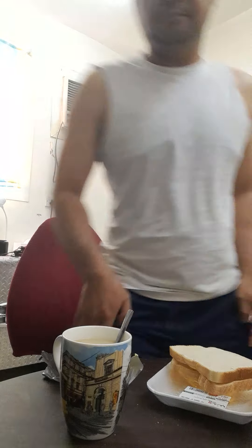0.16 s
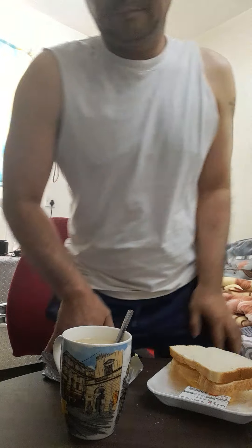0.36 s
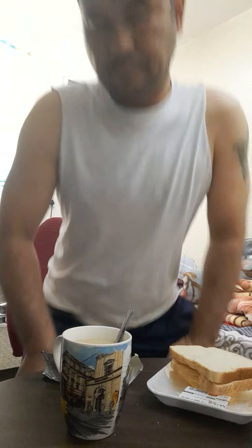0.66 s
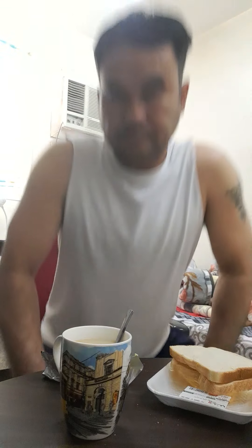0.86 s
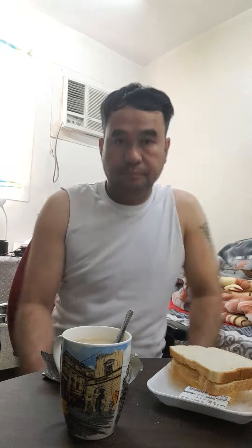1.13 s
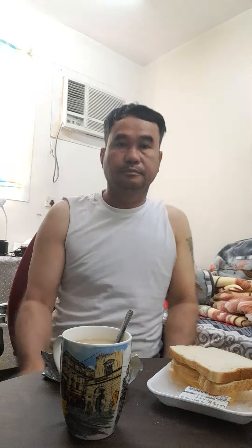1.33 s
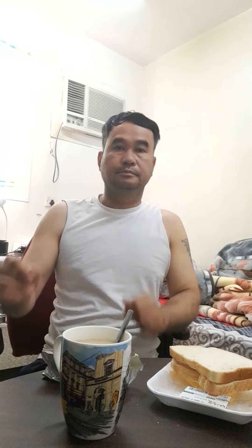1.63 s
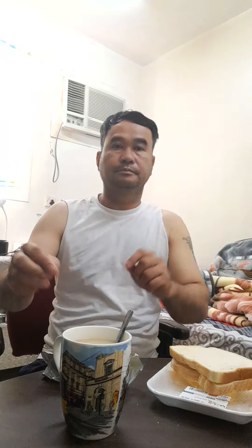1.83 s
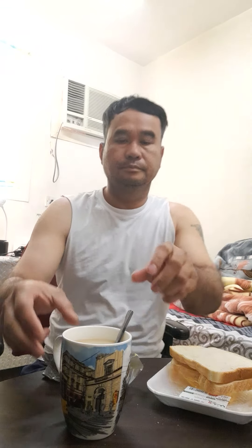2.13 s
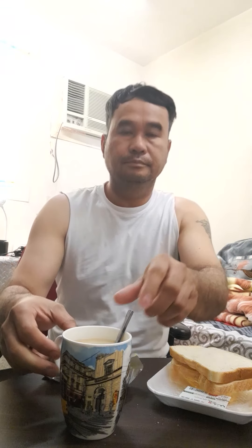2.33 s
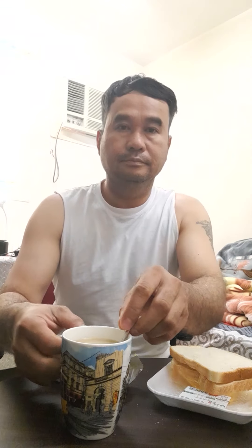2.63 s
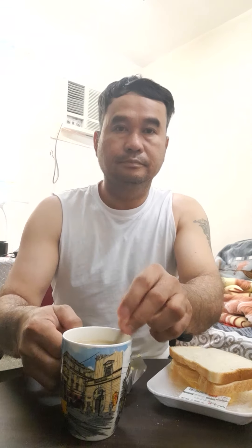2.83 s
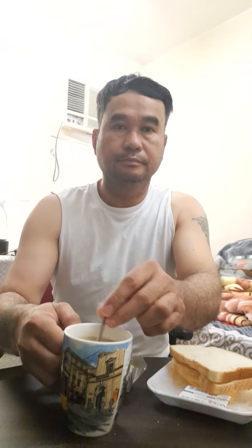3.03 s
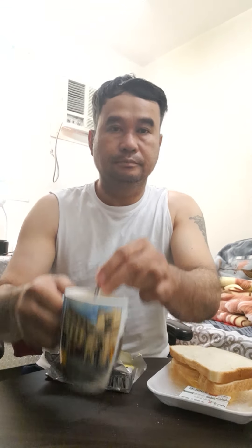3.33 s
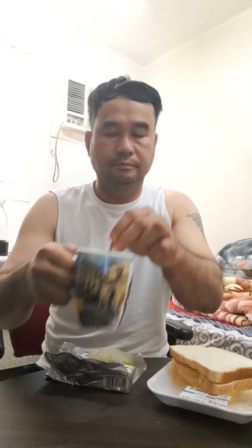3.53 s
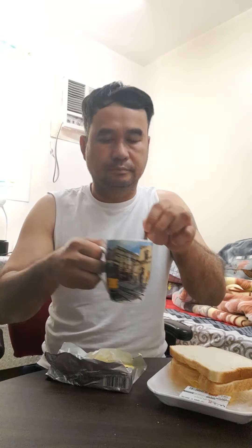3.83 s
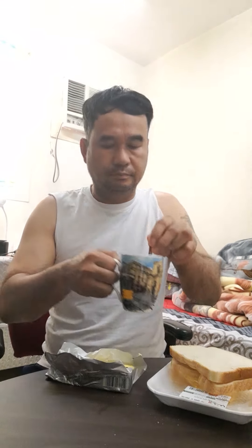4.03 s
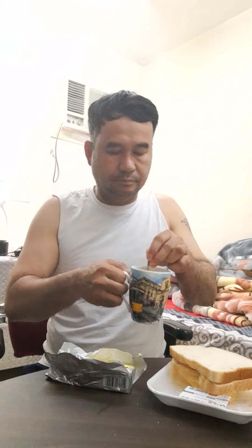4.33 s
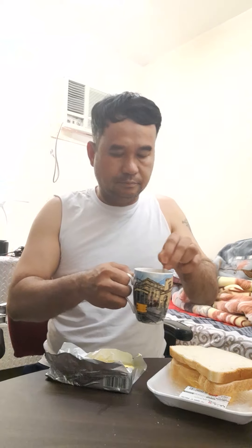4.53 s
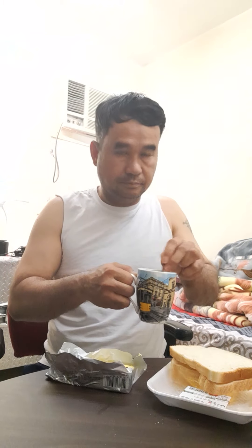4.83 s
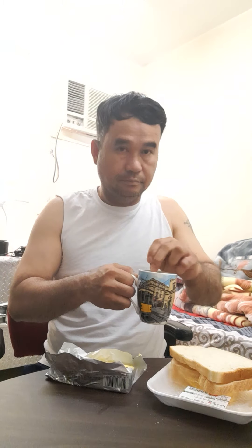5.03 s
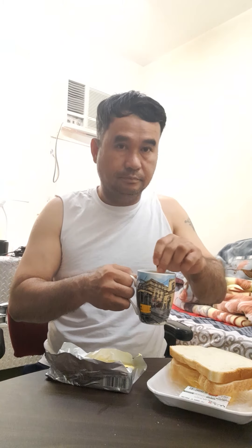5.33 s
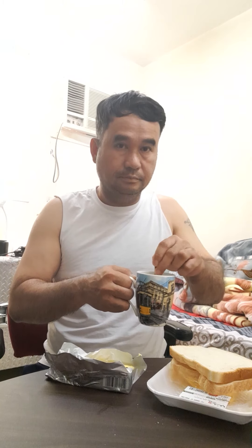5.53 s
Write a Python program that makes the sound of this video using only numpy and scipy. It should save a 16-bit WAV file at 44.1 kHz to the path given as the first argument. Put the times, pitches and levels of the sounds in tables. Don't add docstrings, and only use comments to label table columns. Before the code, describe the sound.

Close stereo pickup in a bedroom: deep motor hum swells and dips throughout. First cloth rustles and body shuffles, then one loud woody chair knock with smaller rattles and creaks. After a calmer moment, a mug's foot bumps and skids across the table while its spoon clinks brightly. Held in the hand, the mug gives isolated ticks, then duller, more frequent stirring taps and faint scraping.

```python
import sys
import numpy as np
from scipy import signal
from scipy.fft import rfft, irfft, next_fast_len
from scipy.io import wavfile

SR = 44100
rng = np.random.default_rng(int(sys.argv[2]) if len(sys.argv) > 2 else 0)


def persist_wave(psi):
    counts = np.round(np.clip(psi, -1, 1) * 32767).astype(np.int16)
    wavfile.write(sys.argv[1], SR, np.atleast_2d(counts).T)


def elevation(decibels):
    levels = np.asarray(decibels, float)
    return 10 ** (levels / 20)


N = 249606
T = np.arange(N) / SR


def rms_one(x):
    return x / np.sqrt(np.mean(x ** 2) + 1e-30)


def in_time(rows, silent=None):
    s, *columns = np.transpose(rows)
    return [np.interp(T, s, c, silent, silent) for c in columns]


def at_hz(points, hz):
    curve_hz, value = np.array(points)[:, 0], np.array(points)[:, 1]
    return np.interp(np.log(hz + 1), np.log(curve_hz), value)


def drift(rate_hz):
    steps_per_s = 60
    steps = rng.standard_normal(int(N / SR * steps_per_s) + 2)
    memory = np.exp(-2 * np.pi * np.clip(rate_hz, .1, 25) / steps_per_s)
    wander = rms_one(signal.lfilter([1], [1, -memory], steps))
    return np.interp(T * steps_per_s, np.arange(len(steps)), wander)


# freq_hz, likeness_0_to_1
PORT_LIKENESS = [(40, 0.8), (150, 0.57), (300, 0.7), (600, 0.22), (1200, 0), (16000, 0.)]


def hiss(spectrum, grain_db=0.):
    size = next_fast_len(N)
    hz = np.fft.rfftfreq(size, 1 / SR)
    grain = elevation(grain_db * np.minimum(rng.exponential(1, size), 5))
    white = rng.standard_normal((2, size)) * grain
    inside = (hz > spectrum[0][0]) * (hz < spectrum[-1][0])
    mid, side = rfft(white) * elevation(at_hz(spectrum, hz)) * inside
    alike = np.clip(at_hz(PORT_LIKENESS, hz), 0, 1)
    both = np.sqrt(1 + alike) * mid + np.sqrt(1 - alike) * side * [[1], [-1]]
    pair = irfft(both, size)[:, :N]
    return pair / np.std(pair.mean(axis=0))


def dying(db, t60, rise_s):
    t = np.arange(int(min(t60, .4) * SR)) / SR
    return t, elevation(db - 60 * t / t60) * (1 - np.exp(-t / rise_s))


def struck(hz, db, t60, rise_s=.0002):
    t, shape = dying(db, t60, rise_s)
    return shape * np.sin(2 * np.pi * hz * t)


def puff(db, t60, low_hz, high_hz, rise_s=.0002):
    band = signal.butter(3, [low_hz, high_hz], "band", fs=SR, output="sos")
    t, shape = dying(db, t60, rise_s)
    noise = signal.sosfilt(band, rng.standard_normal(len(t) + 900))[400:]
    return shape * rms_one(noise)[:len(t)]


def rung(hz, t60, clicks):
    r, w = elevation(-60 / (t60 * SR)), 2 * np.pi * hz / SR
    return rms_one(signal.lfilter([1, 0, -1], [1, -2 * r * np.cos(w), r * r], clicks))


def strokes(rows, colour_share=0.):
    power = 1e-12
    for s, db, swell_s, fade_s, *colour_db in rows:
        away = np.where(T < s, (s - T) / max(swell_s, .003), (T - s) / max(fade_s, .003))
        power = power + elevation(db + colour_share * sum(colour_db) - 20 * away) ** 2
    return 10 * np.log10(power)


def add(out, s, sound):
    at = int(s * SR)
    out[at:at + len(sound)] += sound[:N - at]


def placed(x, pan_db, lag):
    left = np.interp(np.arange(N) - lag, np.arange(N), x)
    return np.array([left * elevation(pan_db / 2), x * elevation(-pan_db / 2)])


# freq_hz, t60_s
ROOM_DECAY = [(250, 0.62), (1000, 0.43), (4000, 0.25), (12000, 0.19)]


def bedroom(x):
    t = np.arange(int(.4 * SR)) / SR
    tail, white = 0, rng.standard_normal((2, len(t)))
    for low in 125 * 2. ** np.arange(7):
        band = signal.butter(2, [low, 2 * low], "band", fs=SR, output="sos")
        tail = tail + signal.sosfilt(band, white) * elevation(-60 * t / at_hz(ROOM_DECAY, 1.4 * low))
    tail = tail * np.clip(t / 0.0044 - .5, 0, 1)
    tail = tail / np.sqrt(np.sum(tail ** 2) / 2)
    return signal.fftconvolve(x[None], tail, axes=1)[:, :N]


# slow_hz, fast_hz
COMPRESSOR_HZ = (57.965, 58.825)
# order, slow_db, fast_db, left_minus_right_db, slow_turn_rad, fast_turn_rad (turned by the room)
HUM_ORDERS = [(1, -51.3, -48.4, -3.5, 2.05, 2.27), (2, -47.4, -50.3, 0, .32, .05),
              (3, -63, -59.8, -1.2, .85, .8), (5, -75, -74, -6, .4, .4)]
# pitch_hz, level_db
FAN_TONES = [(79, -78), (154, -71)]
# freq_hz, level_db_per_hz
RUMBLE_COLOUR = [(28, -58), (42, 1), (52, -14.5), (64, 13), (74, 4.5), (100, 2), (150, 0), (200, -10.5),
                 (260, -84)]
# freq_hz, level_db_per_hz
AIR_COLOUR = [(120, -29), (200, -7.5), (257, -6.5), (300, -4), (336, -7.5), (464, -10), (885, -23),
              (961, -26.5), (2400, -34), (3120, -45), (5280, -120)]
OPPOSED_AT_S = .6
RUMBLE_DB, AIR_DB = -56.5, -65.5
LULL_DB, LULL_WIDTH = -2.5, 0.63


def air_conditioners():
    hum = 0
    slow, fast = 2 * np.pi * np.outer(COMPRESSOR_HZ, T - OPPOSED_AT_S)
    for order, slow_db, fast_db, pan_db, slow_turn, fast_turn in HUM_ORDERS:
        slow_line = elevation(slow_db) * np.sin(round(order) * slow + slow_turn)
        fast_line = elevation(fast_db) * np.sin(round(order) * fast + fast_turn)
        hum = hum + placed((slow_line - fast_line) * elevation(0.88 * drift(11)), pan_db, 0)
    for hz, db in FAN_TONES:
        tone = elevation(db + 2.5 * drift(2)) * np.sin(2 * np.pi * hz * T + .4 * drift(1.5))
        hum = hum + placed(tone, -1.5, 0)
    throb = np.hypot(np.sin((fast - slow) / 2), np.sin(fast - slow))
    lull_db = LULL_DB * np.exp(-(throb / LULL_WIDTH) ** 2)
    air = elevation(AIR_DB + lull_db + 0.33 * drift(14)) * hiss(AIR_COLOUR) * elevation([[-.6], [.6]])
    rumble = elevation(RUMBLE_DB + 1.9 * lull_db) * hiss(RUMBLE_COLOUR) * elevation([[-1.5], [1.5]])
    return hum + air + rumble


# peak_s, level_db, swell_s, fade_s (swell and fade span 20 dB)
WEIGHT_SHIFTS = [(0.001, -57.5, .05, 0.049), (.11, -66, 0.39, 0.76), (.4, -65.5, 0.46, 0.13),
                 (.51, -53, 0.13, 0.11), (1.01, -52.5, 0.12, 0.19), (1.25, -44.5, 0.076, 0.095),
                 (1.205, -40.5, 0.026, 0.035), (1.42, -51, 0.12, 0.085), (1.68, -68.5, 0.41, 0.51),
                 (1.93, -72, .04, 0.37), (2.27, -69.5, 0.016, 2.9), (2.42, -80, 0.6, 0.15),
                 (5.362, -86, 0.016, .03), (5.44, -67, 0.039, 2.2), (5.659, -62, 0.0099, .05)]
# peak_s, level_db, swell_s, fade_s, fine_fibres_rel_db
RUSTLES = [(0.001, -67.5, .05, 0.055, -5), (.11, -65, 0.25, .45, -5.5), (.285, -55, 0.065, 0.13, -2.5),
           (.37, -64, .2, 0.28, -4), (.51, -49, 0.048, 0.092, -5), (.77, -68, 0.95, 0.48, 1),
           (1.06, -66.5, 0.61, 0.27, 4.5), (1.11, -57, 0.0094, 0.18, -17), (1.25, -49, 0.013, 0.11, -10),
           (1.42, -76.5, 0.11, 0.5, 2.5), (1.65, -69.5, 0.13, 0.51, -1), (1.85, -74.5, 0.4, 0.26, 3.5),
           (1.93, -63, 0.038, 0.1, 1.5), (2.26, -78.5, 0.081, 0.42, -1)]
# peak_s, level_db, swell_s, fade_s
SLEEVE_SLIDES = [
    (1.5, -73.5, 0.32, 0.49),
    (1.64, -71, 0.17, 0.16),
]
# freq_hz, level_db_per_hz
SHUFFLE_COLOUR = [(120, -43), (200, -3), (320, 2.5), (358, 0), (392, -2.5), (1020, -10.5), (2200, -18.5),
                  (2860, -64), (4840, -120)]
# freq_hz, level_db_per_hz
CLOTH_COLOUR = [(760, -10), (1300, -14.5), (1550, -7), (1870, -6.5), (1980, -3), (2470, -7), (4360, -3.5),
                (4750, -7), (7460, -8), (8600, -35), (11200, -64), (18900, -120)]
# freq_hz, level_db_per_hz
FIBRE_COLOUR = [(4710, -8.5), (8000, -10), (9040, -11.5), (12600, -5.5), (15100, -11.5), (16000, -19)]
# freq_hz, level_db_per_hz
SLEEVE_COLOUR = [(5800, -30), (6500, 0), (7600, -2), (8200, -27), (10500, -20), (11500, 1), (13000, -4),
                 (14500, -27)]


def clothes():
    shuffle = elevation(strokes(WEIGHT_SHIFTS)) * hiss(SHUFFLE_COLOUR, grain_db=3)
    cloth = elevation(strokes(RUSTLES) + .8 * drift(14)) * hiss(CLOTH_COLOUR, grain_db=2)
    fibres = elevation(strokes(RUSTLES, 1)) * hiss(FIBRE_COLOUR, grain_db=2.5)
    sleeve = elevation(strokes(SLEEVE_SLIDES)) * hiss(SLEEVE_COLOUR)
    return (shuffle + cloth + fibres + sleeve) * elevation([[-.7], [.7]])


# peak_s, peak_db, place (0 seat, 1 back, 2 frame), joint_rel_db
CHAIR_KNOCKS = [(.966, -51, 1.5, 0), (0.982, -46.5, 0.5, -10), (1.0, -59, 2, -14), (1.107, -27, 3, -9.5),
                (1.116, -39, 1.3, -16), (1.207, -42.5, 0, 0), (1.218, -48, 0.5, -12),
                (1.232, -35.5, 1.96, -17), (1.247, -45, 1.5, -20), (1.271, -48.5, 3.5, -10),
                (1.384, -46.5, 1.2, 0), (1.416, -52.5, 0.9, -14), (1.441, -63, 6, -5),
                (1.512, -54, 1.7, -19)]
# pitch_hz, level_db, t60_s, part (0 seat, 1 back, 2 frame, 3 joints)
CHAIR_MODES = [(290, -2, .08, 0), (345, -2, .08, 0), (455, -3, .08, 0), (522, -1, .15, 1),
               (560, 3.5, .18, 1), (640, -6, .06, 1), (900, -9, .06, 2), (1055, -6, .13, 2),
               (1103, 0, .19, 2), (1138, -6, .16, 2), (1240, -9, .06, 2), (1450, -11, .04, 2),
               (2000, -4, .05, 3), (2250, -3, .05, 3), (2420, -7, .045, 3), (2690, -10, .04, 3),
               (1700, -8, .04, 3)]
NEXT_PART_DB = -4


def chair_knocks():
    out = np.zeros(N)
    chances = rng.normal(0, 1, (len(CHAIR_KNOCKS), len(CHAIR_MODES)))
    for (peak_s, db, place, joint_db), luck in zip(CHAIR_KNOCKS, chances):
        parts = [*(NEXT_PART_DB * (np.arange(3) - place) ** 2), joint_db]
        s = peak_s - .003
        loose = .003 * np.clip(-32 - db, 0, 14)
        for (hz, mode_db, t60, part), chance in zip(CHAIR_MODES, luck):
            level_db = db + parts[round(part)] + mode_db - 0.5
            pitch_hz = hz * (1 + loose * chance * (.3 if part == 3 else 1))
            add(out, s, struck(pitch_hz, level_db, t60 / (1 + 45 * loose), rise_s=.0018))
        add(out, s, puff(db + parts[2] - 5, 0.073, 440, 1560, rise_s=0.00077))
        add(out, s, puff(db + parts[3] - 7.5, 0.055, 1400, 3440, rise_s=0.00045))
        add(out, s, puff(db + parts[2] - 8, .03, 350, 3400))
    return placed(out, -2.5, -9) + elevation(-3.5) * bedroom(out)


# start_s, peak_db, pitch_hz, t60_s
CREAKS = [(.953, -58, 2010, 0.12), (.962, -55.5, 2130, 0.097), (.975, -56, 1800, .08),
          (.963, -50, 450, 0.16), (1.003, -49, 1100, 0.039), (1.104, -42, 4200, 0.045),
          (1.105, -42, 2220, 0.079), (1.107, -43, 2700, 0.061), (1.228, -42, 850, 0.072),
          (1.245, -47, 3340, 0.071), (1.19, -51, 2320, 0.076), (1.199, -42, 2200, .06),
          (1.229, -45, 1250, .06), (1.381, -53, 2280, 0.13), (1.43, -63, 2220, 0.15),
          (1.51, -54.5, 514, 0.11)]


def chair_creaks():
    creaks = np.zeros(N)
    for s, db, hz, t60 in CREAKS:
        add(creaks, s, puff(db, t60, hz * 0.87, hz * 1.103, rise_s=0.002))
    return placed(creaks, -1.7, -2.5) + elevation(-4.5) * bedroom(creaks)


# start_s, peak_db
THUDS = [
    (2.666, -54),
    (2.703, -55),
    (2.8762, -27.5),
    (3.018, -39),
    (3.041, -42.5),
    (3.064, -44.5),
]
# pitch_hz, level_db, t60_s
TABLE_MODES = [(166.5, 0.5, 0.15), (213.4, -3, 0.24), (273, 10, 0.05), (319, 16, 0.031), (459, -4, 0.11),
               (550, -8, 0.089), (710, -5, 0.042), (990, -24, 0.022), (1430, -4.5, 0.019)]
# start_s, peak_db, pitch_hz, t60_s
CATCHES = [(2.567, -52, 704, 0.07), (2.669, -49, 454, .04), (2.69, -54.5, 1420, .04),
           (2.704, -47.5, 1000, 0.023), (2.745, -45.5, 1056, 0.028), (2.746, -51, 754, 0.028),
           (3.022, -57, 1437, 0.11), (3.028, -38, 385, 0.037), (3.04, -61, 1050, .05),
           (3.058, -55, 970, .05), (3.066, -53.5, 783, 0.054), (3.077, -54, 1374, 0.046),
           (3.082, -60, 690, 0.035)]
# peak_s, level_db, swell_s, fade_s
SLIDES = [(2.566, -55, 0.039, 0.41), (2.724, -48.5, 0.081, 0.2), (2.81, -51.5, 0.2, 0.028),
          (2.874, -59, 0.0099, 0.052), (3.03, -58, 0.058, 0.18), (3.055, -47, 0.06, 0.051),
          (3.086, -51.5, 0.12, 0.015), (3.1, -62.5, .02, 0.38)]
# pitch_hz, level_db, t60_s
SKID_MODES = [(285, -0.5, 0.1), (346, 3, 0.042), (450, -7.5, 0.095), (690, -9.5, 0.04), (1000, -14, 0.049),
              (1380, -13.5, 0.046), (1950, -5.5, 0.05)]
# peak_s, level_db, swell_s, fade_s
FINGER_RUBS = [
    (2.355, -70.5, .03, 0.077),
    (2.395, -78, .1, 0.025),
]
# freq_hz, level_db_per_hz
DRAG_COLOUR = [(110, -35), (180, 8), (322, -12), (502, -12), (594, -0.5), (649, -12), (1030, -12.5),
               (1290, -17), (1410, -18), (1580, -14.5), (1900, -9.5), (2470, -15), (4180, -120)]
# freq_hz, level_db_per_hz
GRIT_COLOUR = [(1900, -34), (2600, -1), (4200, -3), (7000, -9), (11000, -15.5), (15500, -5)]
SLIPS_PER_S, SKID_DB, GRIT_DB = 860, -12.5, -18.5


def table():
    bumps = np.zeros(N)
    for s, db in THUDS:
        for hz, mode_db, t60 in TABLE_MODES:
            add(bumps, s, -struck(hz, db + mode_db - 11, t60, rise_s=0.0029))
    for s, db, hz, t60 in CATCHES:
        add(bumps, s, struck(hz, db, t60, rise_s=0.00059))
    drag_db = strokes(SLIDES)
    slips = rng.standard_normal(N) * (rng.random(N) < SLIPS_PER_S / SR)
    skid = sum(elevation(db) * rung(hz, t60, slips) for hz, db, t60 in SKID_MODES)
    bumps += elevation(drag_db + SKID_DB) * skid
    bumps += elevation(strokes(FINGER_RUBS)) * rung(1500, 0.011, rng.standard_normal(N))
    drag = elevation(drag_db - 8.5 + 3.2 * drift(22)) * hiss(DRAG_COLOUR, grain_db=1)
    grit = elevation(drag_db + GRIT_DB) * hiss(GRIT_COLOUR, grain_db=-7)
    return placed(bumps, -10, 7.5) + elevation(-9.5) * bedroom(bumps) + (drag + grit) * elevation([[-2.5], [2.5]])


# start_s, peak_db, wall_rel_db (depth), crack_rel_db (edge-on), rim_rel_db (bounce)
LOOSE_TICKS = [(2.5187, -77.5, 11, 5, 3), (2.5663, -49, -11, -12, 8.5), (2.582, -51.5, 0, -14, 2.5),
               (2.593, -72, -1, -11, 6), (2.604, -68, -6, -11, 6), (2.614, -66.5, 11, -6, -6),
               (2.6357, -66, 10, -6, 4), (2.66, -67.5, 12, -6, 11), (2.7039, -85, 12, 42, -8),
               (2.7213, -56, 0, 12.5, 13), (2.7452, -42.5, 0.5, 8.5, 0.5), (2.847, -76, -4, 20, -10),
               (2.9745, -54, 7, 5, -1), (3.0417, -63, -3, 11, -10), (3.163, -79.5, 18.5, 5, 4),
               (3.175, -71, -3, 6, -5), (3.1911, -77.5, 26, 7, 0), (3.222, -69, 16, -12, -10),
               (3.264, -45.5, 4.5, -10, -12), (3.284, -66, 16, -6, -1), (3.3627, -57.5, 10.5, 1.5, -9.5),
               (3.693, -60, -14, -17, -17), (3.732, -54, 0, -24, -1), (3.775, -79, 26, 0, 0),
               (3.993, -77.5, 3, 20, -8), (4.0157, -63.5, -30, 2, -21), (4.2634, -52, -4.5, 2, -5.5),
               (4.4377, -70, -14, -20, -4), (4.5136, -48.5, -5, -18, -6), (4.561, -73, 14.5, -10, 2),
               (4.6, -81, 9, -10, 4)]
# start_s, peak_db, wall_rel_db, crack_rel_db, rim_rel_db
STIR_TICKS = [(4.7341, -72.5, -15, -16, 1), (4.798, -80, -6, 11, 0), (4.8184, -66, 6.5, 9, -5),
              (4.851, -71, 2, 6, 2), (4.8864, -54, -3.5, 2.5, -1), (4.9481, -76, 13, 9, 0),
              (5.022, -66.5, 2.5, 4, 5), (5.0479, -68, 5, 7, -4), (5.0887, -50, -8, -6.5, -5),
              (5.1122, -71.5, 4, 15.5, -5), (5.2356, -81, -2, 14, -5), (5.263, -65, -3, -10, 3),
              (5.2705, -49.5, -6, -3, -5), (5.4036, -59.5, -4.5, -2, -2), (5.427, -48, -5, -8, 3.5),
              (5.5538, -47.5, -4, 2, -3), (5.5961, -45, 0.5, 11, -2), (5.6544, -65, 6, 1.5, 0)]
# pitch_hz, level_db, t60_s, part (0 wall, 1 rim, 2 spoon, 3 handle)
MUG_MODES = [(2170, -16, .08, 0), (2410, -22, .05, 0), (5020, -14, .02, 1), (5570, 3, .07, 1),
             (5630, -7, .06, 1), (5740, -10, .06, 1), (5900, -9, .04, 1), (6260, -15, .025, 1),
             (6560, -11, .025, 1), (7000, -12, .02, 2), (7420, -1, .028, 2), (7750, -8, .025, 2),
             (8215, -4, .028, 2), (9400, -11, .025, 2), (3960, -8, .02, 3)]
LOOSE_PITCH = .008
DROWNED_DB = 12
HELD_RIM_DB = -10.5
KNOCK_HZ, KNOCK_DB, KNOCK_T60_S = 1885, 11.5, 0.012


def spoon_ticks(held, sag):
    out, ticks = np.zeros(N), [*LOOSE_TICKS, *STIR_TICKS]
    chances = rng.normal(0, 1, (len(ticks), len(MUG_MODES)))
    for (s, db, depth_db, edge_db, bounce_db), luck in zip(ticks, chances):
        hold, rim_sag = held[int(s * SR)], sag[int(s * SR)]
        spoon_db = -DROWNED_DB * 1.6 * hold ** 4
        parts = [depth_db, bounce_db, spoon_db, edge_db]
        for (hz, mode_db, t60, part), chance in zip(MUG_MODES, luck):
            grip_db = (HELD_RIM_DB if mode_db > 0 else -3) * hold
            level_db = db + parts[round(part)] + mode_db + grip_db + 1.5 * chance
            pitch = rim_sag if part == 1 else 1 + LOOSE_PITCH * hold * chance
            add(out, s, struck(hz * pitch, level_db, t60 / (1 + 2.4 * hold)))
        knock_hz = KNOCK_HZ * (1 + 0.042 * luck[0])
        add(out, s, hold ** 2 * struck(knock_hz, db + depth_db + KNOCK_DB, KNOCK_T60_S))
        add(out, s, hold ** 2 * puff(db + depth_db - 2, 0.094, 1865, 2370))
        add(out, s, hold * puff(db + 5, 0.0098, 4370, 6400))
        add(out, s, hold * puff(db + bounce_db + 1.1 * spoon_db - 1.5, 0.061, 5280, 5340))
        add(out, s, hold * puff(db + 2.2 * spoon_db + 0.5, 0.053, 6740, 7820))
        add(out, s, puff(db + edge_db - 1, 0.011, 3370, 5350))
        add(out, s, puff(db - 4 - 3.7 * hold, 0.011, 3000, 11500))
        add(out, s, puff(db - 26, 0.014, 13000, 22000))
    return out


# start_s, peak_db, low_hz, high_hz,
# t60_s
BRUSHES = [(3.042, -57.5, 3800, 7400, 0.085), (3.265, -61, 4200, 9000, 0.12), (4.262, -67, 1220, 1950, .06),
           (4.2632, -50, 6270, 8600, 0.024), (4.4378, -66.5, 5240, 15000, 0.069),
           (4.5136, -62.5, 5300, 6100, 0.064), (4.8174, -71.5, 3300, 4660, 0.17),
           (4.8864, -67.5, 6500, 11000, .1), (5.262, -65, 5800, 8100, .12), (5.427, -64, 6000, 8750, .15),
           (5.554, -59, 5800, 8900, .08), (5.5958, -58, 3500, 8600, 0.13), (2.567, -54, 8500, 16000, .025),
           (2.581, -58, 8400, 16000, .03), (2.7455, -53, 8600, 16000, 0.028),
           (5.427, -57, 8000, 14000, .01), (5.0891, -54, 4870, 6600, 0.011), (5.403, -62, 4000, 6050, .012)]


def spoon_brushes():
    out = np.zeros(N)
    for s, db, low_hz, high_hz, t60 in BRUSHES:
        add(out, s, puff(db, t60, low_hz, min(high_hz, 20000), rise_s=.0003))
    return out


# peak_s, rim_db, swell_s, fade_s, wall_rel_db (depth)
RUBS = [(2.45, -87, 0.12, .2, 0), (2.65, -83, 0.1, 0.18, 6), (2.8, -67.5, 0.13, 0.072, 15.5),
        (3.21, -89.5, 0.025, 0.085, 37), (3.44, -91, 0.074, 0.048, 21), (3.82, -71, 0.12, 0.037, 9),
        (4.3, -101.5, 0.11, 0.15, 28.5), (4.95, -73.5, 0.48, 0.28, -14), (5.33, -71, 0.23, 0.39, -13.5),
        (5.44, -60.5, 0.026, 0.2, -14), (5.6, -85, 0.081, 0.073, 13)]
WALL_HZ, WALL_T60_S = 2083, .3


def wall_bell(held):
    energy = (elevation(strokes(RUBS, 1) - 1) * (1 - .6 * held)) ** 2
    for s, db, depth_db, _, _ in [*LOOSE_TICKS, *STIR_TICKS]:
        hold = held[int(s * SR)]
        t, ring = dying(db + depth_db - 2 - 6 * hold, WALL_T60_S / (1 + 1.2 * hold), .001)
        settled = 1 + (t / 0.047) ** 3.5
        add(energy, s, (ring / settled) ** 2)
    tone = np.sin(2 * np.pi * WALL_HZ * T + .5 * drift(12))
    return np.sqrt(energy) * elevation(1.2 * drift(25) - 1) * tone


# time_s, level_db
RIM_GRAB = [
    (2.49, -99),
    (2.518, -63.5),
    (2.562, -59),
    (2.57, -47),
    (2.696, -70),
    (2.7, -80),
]
# freq_hz, level_db_per_hz
RASP_COLOUR = [(3500, -12), (4600, -5), (5200, 1), (5600, 10.5), (6100, -4), (6800, -35), (7500, -20),
               (9500, -19)]
HANDLE_DB, HANDLE_PER_DEPTH = 14.5, -0.51


def spoon_rubbing(held, sag):
    wall_db, rim_db = strokes(RUBS, 1), strokes(RUBS)
    handle_db = HANDLE_DB + strokes(RUBS, HANDLE_PER_DEPTH)
    grains = rng.standard_normal(N) * (rng.random(N) < 2500 / SR)
    band = signal.butter(4, [1900, 2500], "band", fs=SR, output="sos")
    out = held * elevation(wall_db + 6.5) * rms_one(signal.sosfilt(band, grains))
    part_db = [0, rim_db - 11, rim_db - 14, handle_db + 9 - 60 * held]
    for hz, mode_db, t60, part in MUG_MODES[2:]:
        ringing = (1 - held) * rung(hz, t60 * (1.8 if part == 3 else .5), grains)
        if part == 1:
            ringing = ringing + held * .4 * rung(hz * sag[-1], t60 / 8, grains)
        out += elevation(part_db[round(part)] + 2 * mode_db) * ringing
    rasp_db = in_time(RIM_GRAB, silent=-120)[0] - 3.5
    return out + elevation(rasp_db) * hiss(RASP_COLOUR, grain_db=4)[0]


# time_s, room_share_db, left_minus_right_db, left_lag_samples
MUG_PATH = [(2.4, -26, -13, 3.8), (3.4, -1.5, -9, 7), (3.8, -6, -4, 6.5), (4.55, 5.5, -10, 0.46),
            (4.8, 0, -8.5, 1.2), (5.66, -7.5, -6.5, 2.4)]
# time_s, grip_0_to_1
GRIP = [
    (3.45, 0),
    (3.7, .1),
    (4.3, .28),
    (4.45, .5),
    (4.6, .5),
    (4.8, .75),
    (5.66, .75),
]
# time_s, pitch_ratio
RIM_SAG = [(3.1, 1), (3.25, .992), (3.75, .996), (4.3, .998), (4.5, .99), (4.7, .98), (5.1, .978),
           (5.66, .983)]


def mug():
    room_db, pan_db, lag = in_time(MUG_PATH)
    held, sag = in_time(GRIP)[0], in_time(RIM_SAG)[0]
    spoon = spoon_ticks(held, sag) + spoon_brushes() + spoon_rubbing(held, sag)
    bell = wall_bell(held)
    return placed(spoon + bell, pan_db, lag) + bedroom((spoon + elevation(-10) * bell) * elevation(room_db))


def scene():
    return air_conditioners() + clothes() + chair_creaks() + chair_knocks() + table() + mug()


# freq_hz, level_db_per_hz
SELF_NOISE_COLOUR = [(2300, -59), (2700, -9), (3300, -11), (4200, -11), (6000, -10.5), (7600, -9.5),
                     (9000, -12), (10500, -9), (13000, -4), (15600, 0.5), (16300, 4.5)]
# time_s, share_0_to_1
PORT_SHADE = [(0, 0.28), (2.2, 0.22), (3.5, 0.54), (4.6, 0.05), (4.8, 0.55), (5.38, 0.8), (5.46, 0),
              (5.66, 0)]
SELF_NOISE_DB = -76.5
PORT_DIP_HZ = 3300


def microphones(dry):
    heard = dry + elevation(SELF_NOISE_DB) * hiss(SELF_NOISE_COLOUR) * elevation([[-.6], [.6]])
    shade = np.clip(in_time(PORT_SHADE)[0], 0, 1)
    heard = heard - shade * signal.lfilter(*signal.iirpeak(PORT_DIP_HZ, 3.5, fs=SR), heard)
    top = signal.cheby2(12, 60, 16700, fs=SR, output="sos")
    return signal.sosfilt(top, heard)


def roll_off(x):
    return signal.sosfilt(signal.butter(12, 15840, fs=SR, output="sos"), x)


def record(dry):
    mix = microphones(dry)
    return roll_off(mix)


dry = scene()
out = record(dry)
persist_wave(out)
```